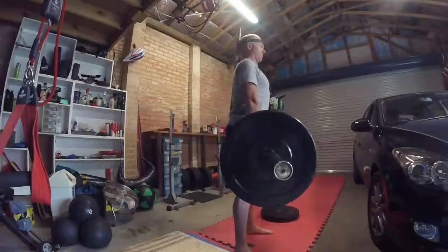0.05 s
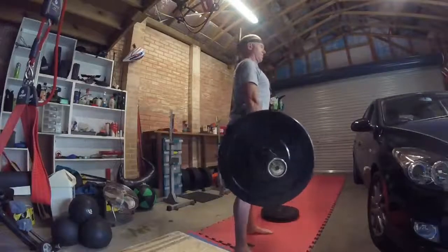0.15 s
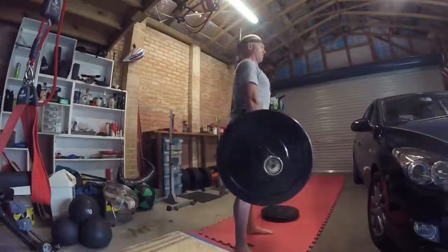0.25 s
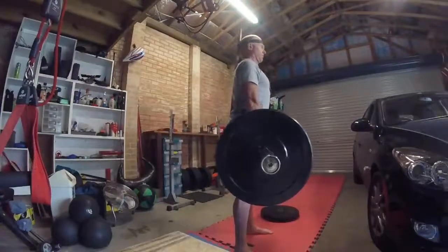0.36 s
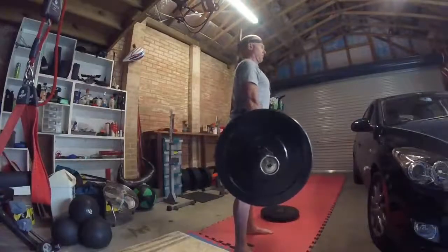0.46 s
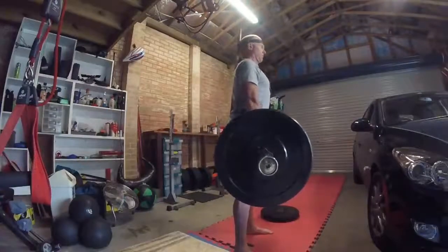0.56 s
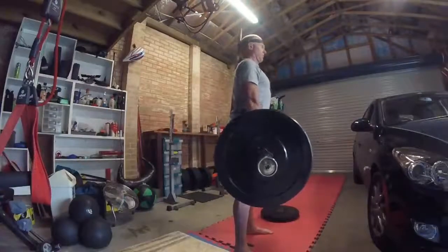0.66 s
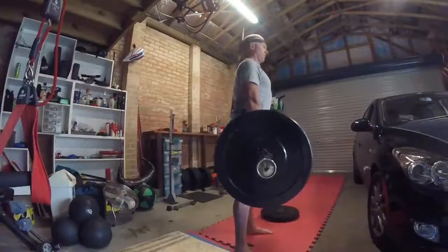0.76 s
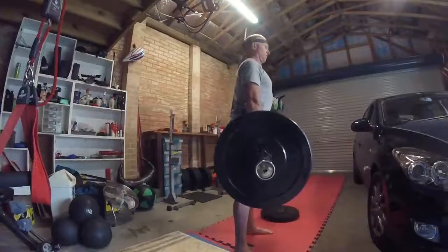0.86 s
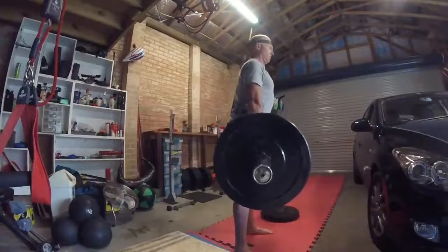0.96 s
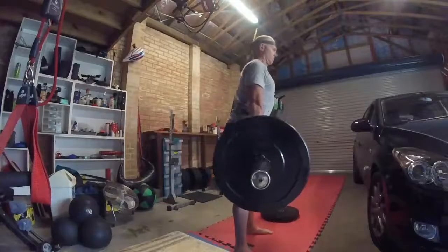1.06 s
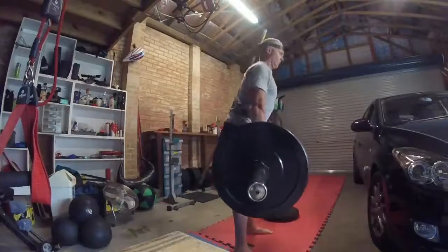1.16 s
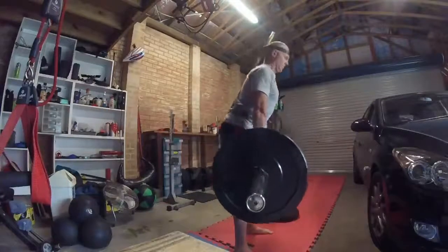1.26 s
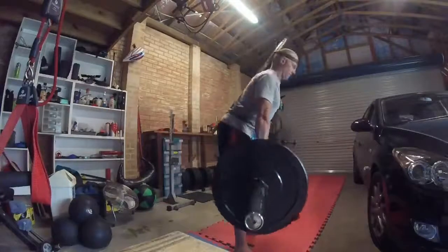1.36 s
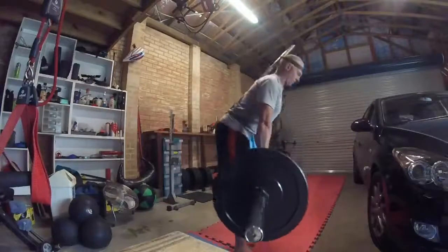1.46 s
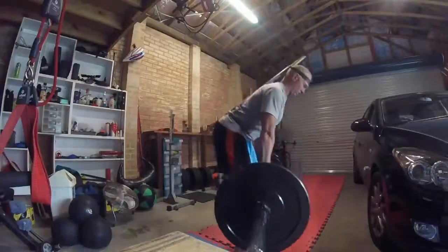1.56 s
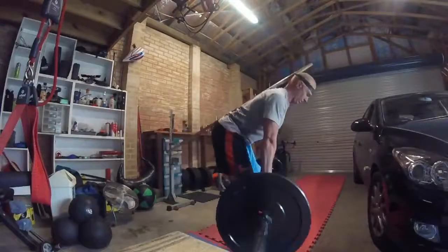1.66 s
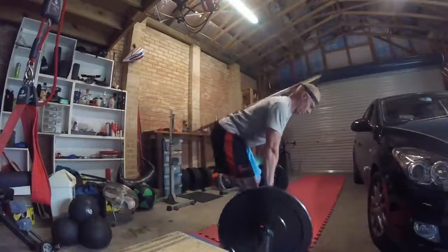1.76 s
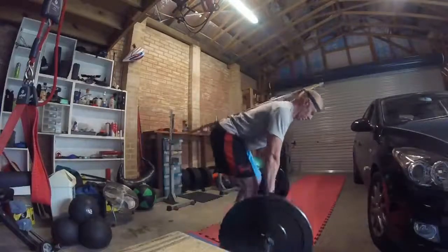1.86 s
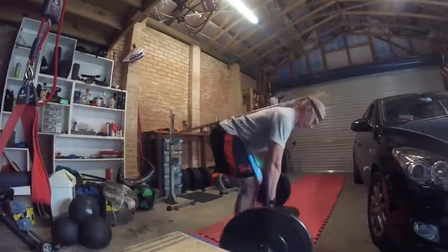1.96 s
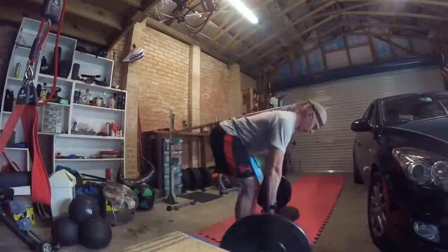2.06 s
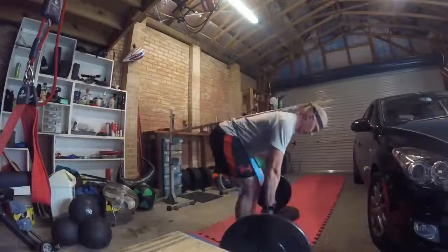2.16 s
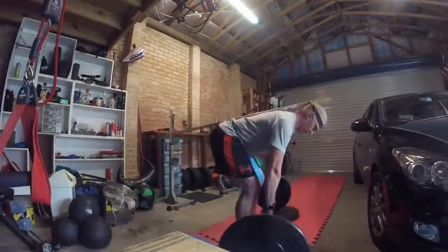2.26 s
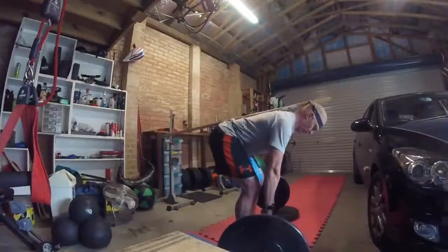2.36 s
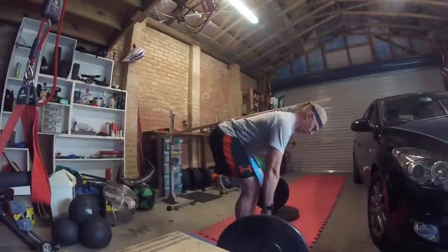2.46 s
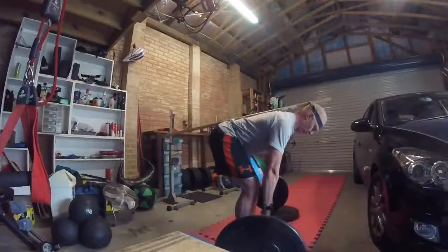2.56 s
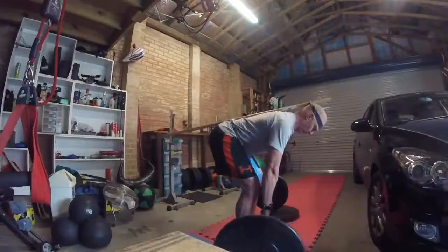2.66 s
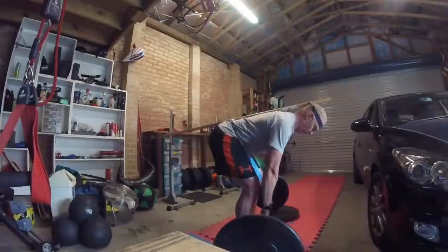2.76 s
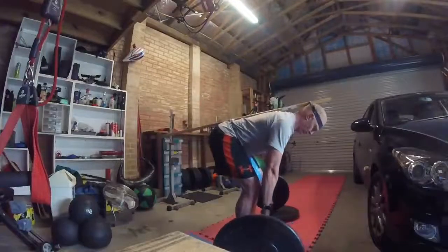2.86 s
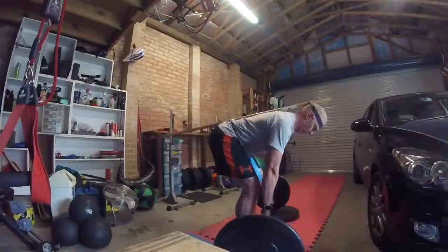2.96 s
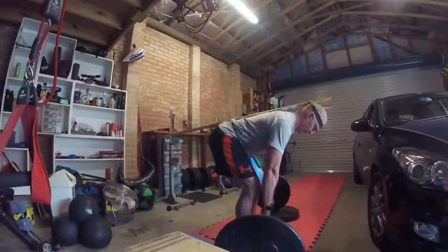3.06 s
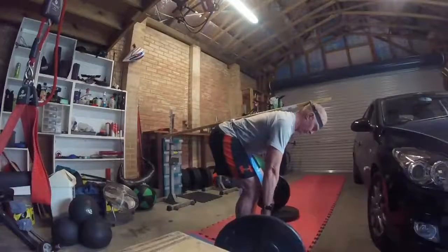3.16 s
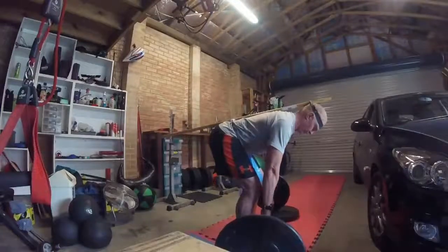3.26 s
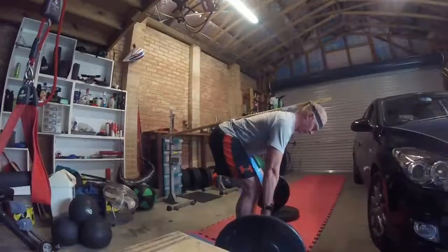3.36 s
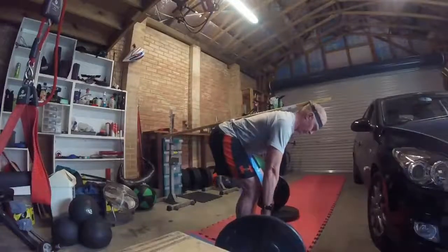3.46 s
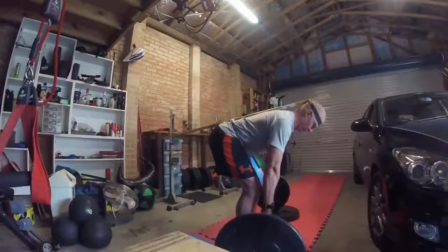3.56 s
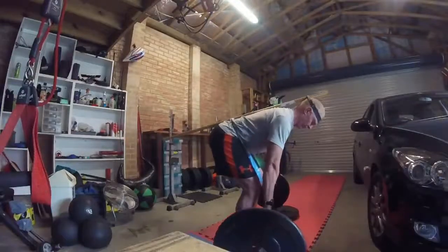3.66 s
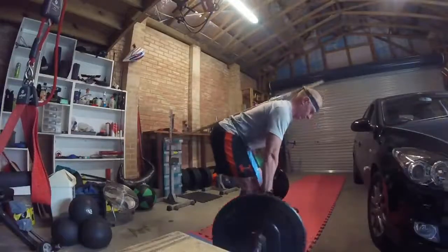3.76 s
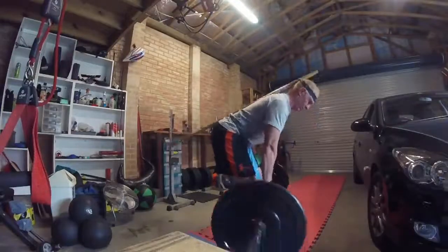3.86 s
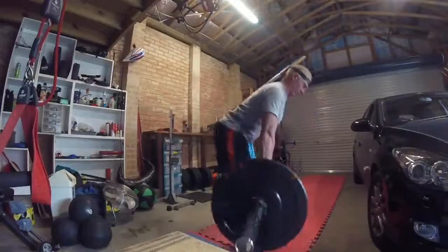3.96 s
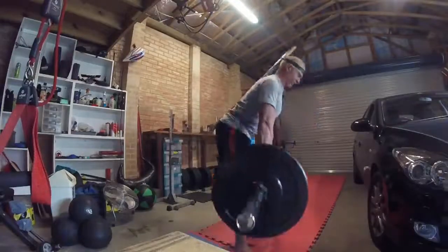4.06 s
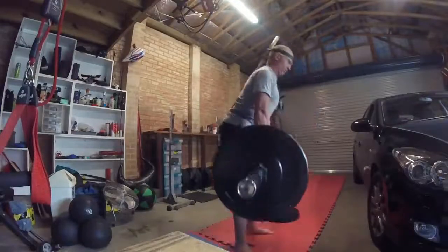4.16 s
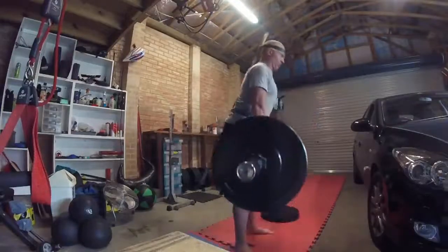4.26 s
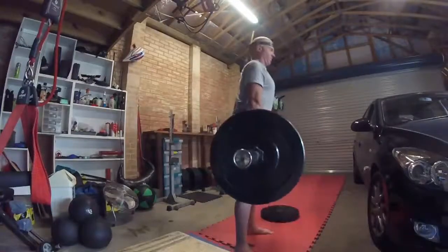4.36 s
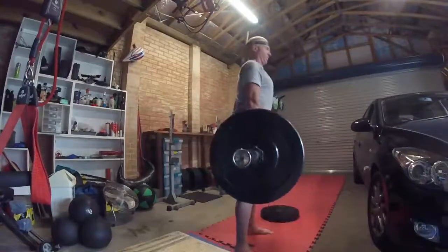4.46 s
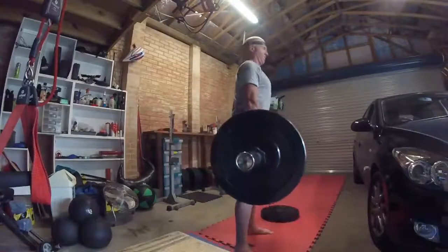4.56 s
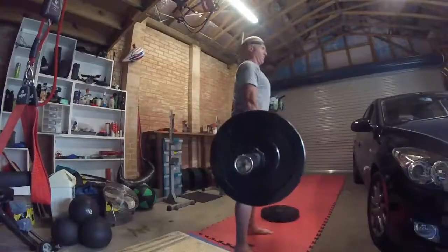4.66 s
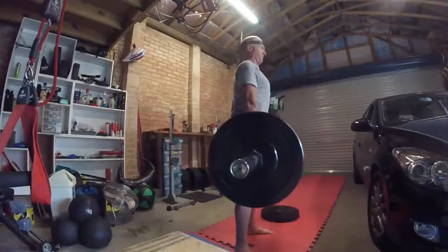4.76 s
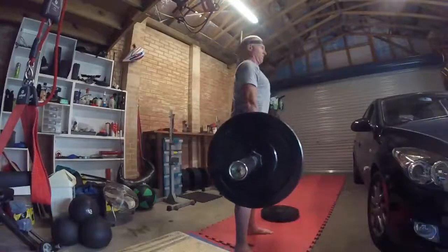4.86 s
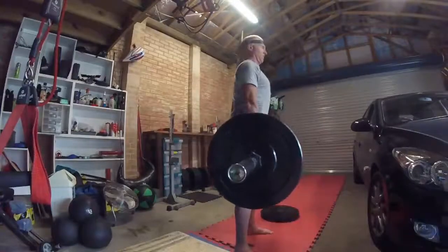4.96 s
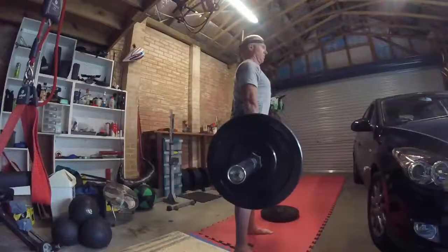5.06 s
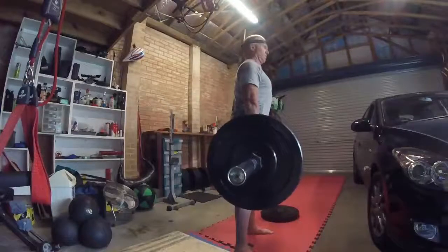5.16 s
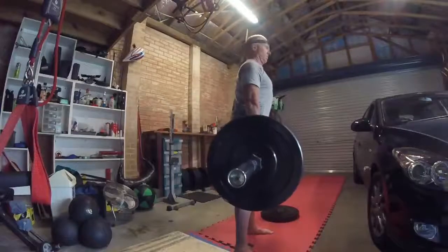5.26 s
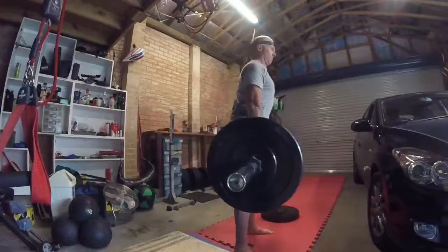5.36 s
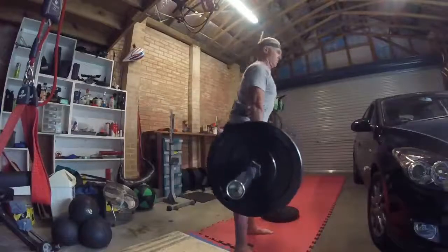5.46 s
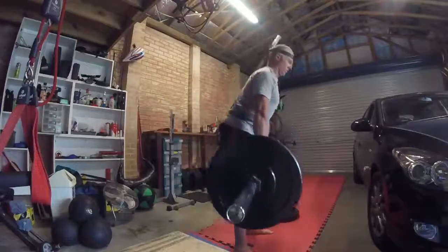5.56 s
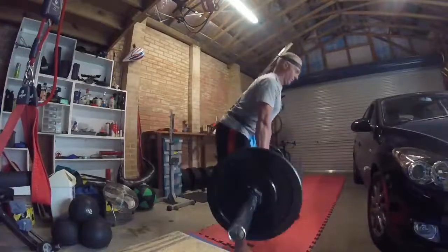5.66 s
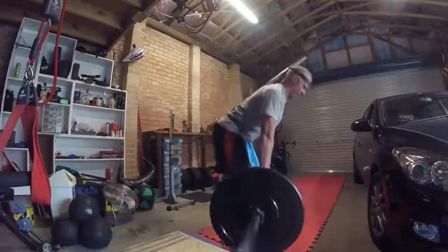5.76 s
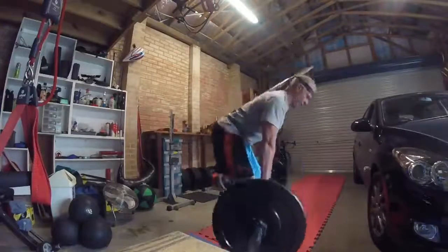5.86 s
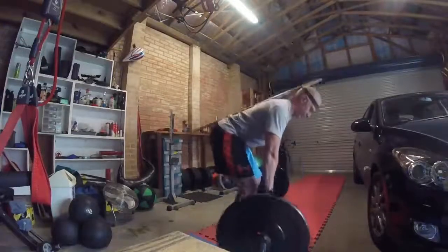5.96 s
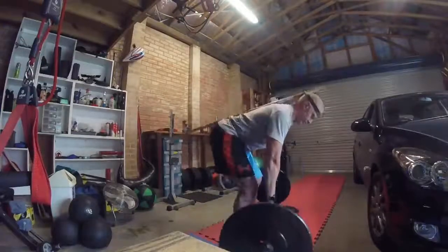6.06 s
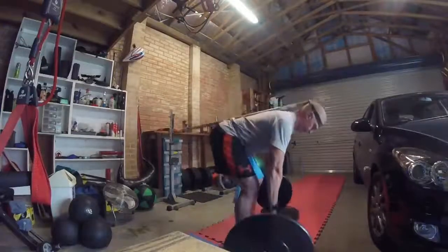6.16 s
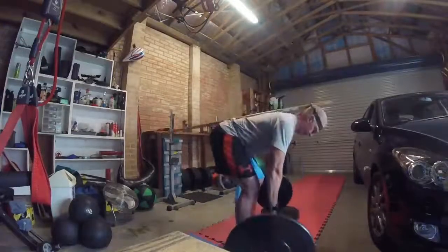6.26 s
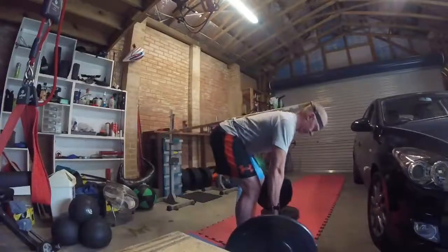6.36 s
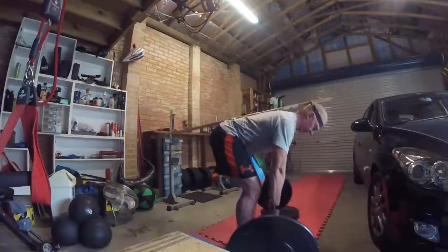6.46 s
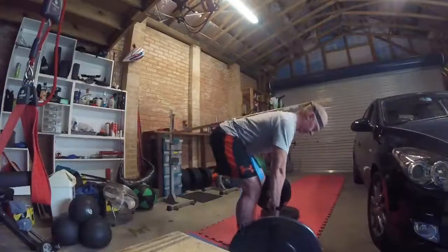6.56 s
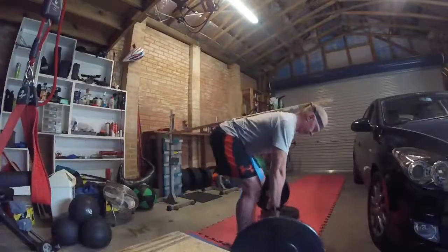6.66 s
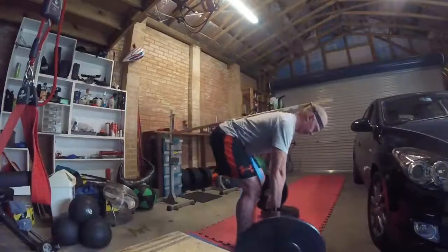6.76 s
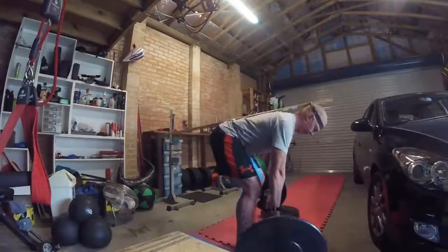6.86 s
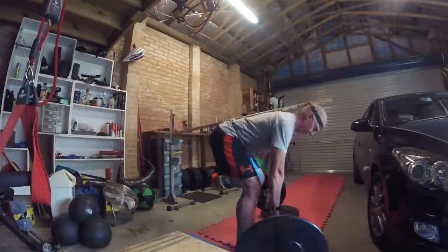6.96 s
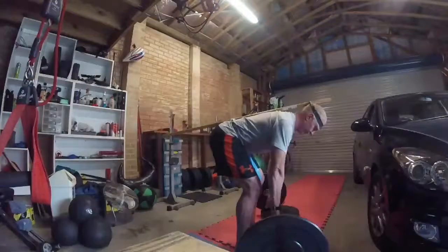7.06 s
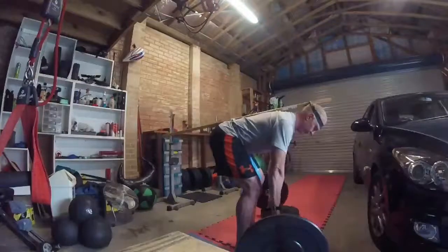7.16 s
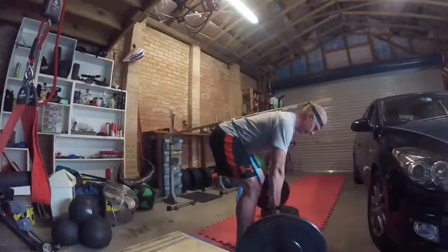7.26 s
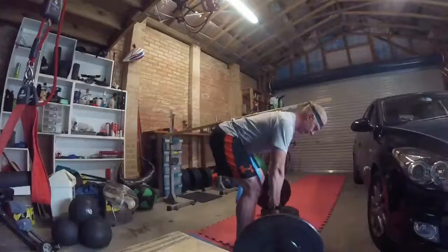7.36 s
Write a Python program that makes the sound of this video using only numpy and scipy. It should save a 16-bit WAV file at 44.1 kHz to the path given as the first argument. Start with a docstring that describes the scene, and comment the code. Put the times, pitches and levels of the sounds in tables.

```python
"""A loaded barbell is set down hard twice in a brick garage, and tugged off the floor once in between.
Rubber plates thud as damped springs; steel hubs knock and rattle on the sleeves as noise bursts through
the modes of bar and hubs. Small clicks mark shifting collars and plates; the garage answers each blow.
Behind lie a faint hiss, a thin whine and a low hum that rises and sinks in pitch about every two seconds.
Each landing pushes the recorder's gain down a little, and it creeps back."""
import sys
import numpy as np
from scipy import signal
from scipy.fft import rfft, irfft, next_fast_len
from scipy.io import wavfile

SR = 44100
rng = np.random.default_rng(int(sys.argv[2]) if len(sys.argv) > 2 else 0)


def inscribe(sig):
    """Save sig as 16-bit PCM at rate SR to the path in sys.argv[1].

    A 1-D sig is mono; a 2-D sig holds one channel per row.
    Samples are clipped to [-1, 1] before scaling.
    """
    pcm = np.round(np.clip(np.atleast_2d(sig).T, -1, 1) * 32767)
    wavfile.write(sys.argv[1], SR, pcm.astype(np.int16))


N = 326731
FILTER_HZ = np.maximum(np.arange(4097) * SR / 8192, 1)
BLOW_S = np.arange(SR) / SR   # one second after a blow


def from_db(db):
    """Decibels to amplitude gain."""
    return 10 ** (np.asarray(db) / 20)


def at_hz(points, hz):
    """Read a (Hz, value) table on a log-frequency axis."""
    table_hz, value = np.transpose(points)
    return np.interp(np.log(np.maximum(hz, 1)), np.log(table_hz), value)


def add(out, start_s, sound):
    """Mix a sound in at start_s, cut at the end of the scene."""
    at = int(round(start_s * SR))
    out[at:at + len(sound)] += sound[:max(N - at, 0)]


def dying(t60_s):
    """Exponential amplitude that falls 60 dB in t60_s."""
    return np.exp(-np.log(1000) * BLOW_S / t60_s)


def drift(points_per_s):
    """Slow random wander: normally distributed points joined by straight lines."""
    return np.interp(np.arange(N) / SR * points_per_s, np.arange(SR), rng.standard_normal(SR))


def resonances(modes):
    """Gain over FILTER_HZ of a flat body with resonant peaks whose powers add to it."""
    power = 1
    for hz, width_hz, db in modes:
        power = power + from_db(db) ** 2 / (1 + (2 * (FILTER_HZ - hz) / width_hz) ** 2)
    return np.sqrt(power)


def coloured(x, gain):
    """Causal (minimum-phase) filter shaped by gain over FILTER_HZ, scaled to unit energy."""
    cepstrum = irfft(np.log(gain + 1e-9))
    half = len(cepstrum) // 2
    # fold the cepstrum onto positive time
    cepstrum[1:half] *= 2
    cepstrum[half + 1:] = 0
    response = irfft(np.exp(rfft(cepstrum)))
    return signal.fftconvolve(x, response / np.linalg.norm(response))


# Reverberation decay of the garage. Each row: band centre in Hz, t60 in s.
GARAGE_DECAY = [(80, 0.51), (400, 0.39), (1200, 0.47), (3000, 0.57), (5500, 0.53), (12000, 0.5)]


def garage_tail():
    """Dense reflections of one blow, each band dying at its own rate; starts near rms 1."""
    white = rfft(rng.standard_normal(SR))
    band_points = [(hz, k) for k, (hz, _) in enumerate(GARAGE_DECAY)]
    band = at_hz(band_points, np.arange(len(white)))   # bins are 1 Hz apart
    tail = np.zeros(SR)
    for k, (_, t60_s) in enumerate(GARAGE_DECAY):
        share = np.maximum(1 - abs(band - k), 0)
        tail += irfft(white * share, SR) * dying(t60_s)
    return tail


def contact(chatter_s, direct_db, spiky_db=3.0, build_s=0.0034):
    """A chatter of tiny impacts peaking at chatter_s, plus the room; direct_db is their energy ratio."""
    age = BLOW_S / max(chatter_s, 1e-4)
    swell = age * np.exp(-np.minimum(age, 20))
    spikes = from_db(spiky_db * rng.standard_normal(SR))
    chatter = rng.standard_normal(SR) * spikes * swell
    tail = garage_tail() * (1 - np.exp(-BLOW_S / build_s))
    return from_db(direct_db) * chatter * np.linalg.norm(tail) / np.linalg.norm(chatter) + tail


# Thuds of the plates: two landings, the tug between them and a faint late one.
# Each row: start in seconds, level in dB before gain control, bounce pitch in Hz, bounce t60 in s,
# room boom in dB re the bounce.
PLATE_THUDS = [(2.034, -22, 92, 0.36, -9), (2.048, -14.5, 107.6, 0.22, -10), (3.509, -24, 187, 0.041, -18),
               (6.1463, -11.5, 114, 0.18, -12), (6.215, -23, 113.6, 0.27, -5.5), (6.6, -42, 168.7, .1, -19)]
# Standing waves of the garage. Each row: Hz, width in Hz, peak in dB over the boom.
GARAGE_MODES = [(112, 6.5, 4.5), (191, 8.8, 7.5), (248, 18, 10.5)]


def thuds(press_s=0.0021, boom_octaves=0.87):
    """Plates bounce on their rubber like a damped spring; the room booms around that pitch."""
    out = np.zeros(N)
    for start_s, level_db, hz, t60_s, boom_db in PLATE_THUDS:
        onset = 1 - np.exp(-BLOW_S / press_s)
        bounce = np.sin(2 * np.pi * hz * BLOW_S) * dying(t60_s) * onset
        around_pitch = 1 / (1 + (np.log2(FILTER_HZ / hz) / boom_octaves) ** 2)
        gain = resonances(GARAGE_MODES) * around_pitch / (1 + (FILTER_HZ / (8 * hz)) ** 2)
        boom = coloured(garage_tail(), gain)[:SR]
        add(out, start_s, from_db(level_db) * (bounce + from_db(boom_db) * boom))
    return out


# Hubs knocking on sleeves. Each row: start in seconds, level in dB before gain control, rattle scale in s
# (rebounds stop at twice this), chatter peak time in s, tilt in dB per octave above 400 Hz.
HUB_KNOCKS = [(2.034, -15, .075, .0028, 0), (2.05, -13, 0.0022, 0.0016, 0), (2.09, -16, 0, 0.0019, 0),
              (2.189, -28, 0, 0.0034, 0), (3.4668, -47, 0.0009, 0.0026, -5), (3.474, -38, 0.031, .002, -2),
              (3.507, -50, 0.016, 0.00086, -2.5), (4.384, -59.5, 0.00017, .003, -5),
              (6.1426, -37, 0, 0.0013, -12), (6.148, -16.5, .05, 0.0023, 0),
              (6.157, -13.5, 0.0041, 0.0031, 1), (6.186, -14, 0.077, 0.0027, 0),
              (6.6, -56.5, 0.0055, 0.0034, -3)]
# Rebounds: mean gap, loss re the knock, further fade at one rattle scale, added tilt
REBOUND_GAP_S, REBOUND_LOSS_DB, RATTLE_FADE_DB, REBOUND_TILT_DB_PER_OCT = .011, 7, 7.5, 0.33


def rattles():
    """Each knock and its run of weaker, brighter rebounds: rows of (s, dB, chatter s, tilt)."""
    rows = []
    all_gaps = rng.uniform(.7, 1.3, size=(len(HUB_KNOCKS), 24))
    for (start_s, level_db, rattle_s, chatter_s, tilt), gaps in zip(HUB_KNOCKS, all_gaps):
        rows.append((start_s, level_db, chatter_s, tilt))
        for age_s in REBOUND_GAP_S * np.cumsum(gaps):
            if age_s < 2 * rattle_s:
                loss_db = REBOUND_LOSS_DB + RATTLE_FADE_DB * (age_s / rattle_s) ** 2
                rows.append((start_s + age_s, level_db - loss_db, chatter_s, tilt + REBOUND_TILT_DB_PER_OCT))
    return rows


# Ringing of bar and hubs. Each row: Hz, width in Hz, peak in dB over the body of a knock.
BAR_AND_HUB_MODES = [(1056, 16, 9), (1100, 22, 6.5), (1148, 20, 4), (1536, 12, 13), (1807, 14, 11),
                     (2110, 18, 8.5), (2391, 40, 7), (2705, 50, 9), (2831, 16, 13), (2886, 16, 13),
                     (3087, 24, 18.5), (3486, 34, 14.5), (3845, 80, 10), (3955, 50, 8), (4197, 25, 10),
                     (4455, 50, 6), (4645, 90, 8), (5044, 16, 15.5), (5530, 110, 8), (5945, 45, 13),
                     (6110, 50, 7), (6405, 55, 13), (6530, 70, 10), (6850, 70, 7), (7320, 60, 8),
                     (7820, 60, 12), (8380, 110, 10), (8840, 30, 13)]
# Spectrum of a knock's body. Each row: Hz, relative density in dB per Hz.
KNOCK_BODY = [(40, -27), (100, -2.5), (230, 3.5), (480, -2), (700, -1), (1250, -1.5), (1550, -7.5),
              (2200, 2), (3200, -2), (4500, -1), (6600, -5), (8000, -16.5), (10500, -25), (13500, -49.5)]


def clatter(direct_db=-4.5, uneven_db=0.5):
    """Steel knocks on steel; each mode's strength varies slightly at random from knock to knock."""
    out = np.zeros(N)
    for start_s, level_db, chatter_s, tilt in rattles():
        modes = [(hz, width_hz, db + uneven_db * rng.standard_normal())
                 for hz, width_hz, db in BAR_AND_HUB_MODES]
        tilt_db = tilt * np.log2(np.maximum(FILTER_HZ, 400))
        body = from_db(at_hz(KNOCK_BODY, FILTER_HZ) + tilt_db)
        knock = coloured(contact(chatter_s, direct_db), body * resonances(modes))
        add(out, start_s, from_db(level_db) * knock)
    return out


# Collars and plates shifting. Each row: start in seconds, level in dB before gain control,
# pitch in Hz, half-width in octaves, chatter peak time in s.
SHIFT_CLICKS = [(3.475, -50.5, 620, 0.28, 0.0055), (3.48, -45.5, 2480, 0.5, 0.002),
                (3.5058, -42.5, 5260, 0.28, 0.0006), (4.224, -68, 533, 0.29, 0.0019),
                (4.383, -61, 1284, 0.18, 0.0023), (4.39, -71, 2920, .15, .002),
                (4.435, -74, 4100, .18, .001), (6.604, -63, 623, 0.74, 0.0029),
                (7.368, -79, 4290, .5, 0.002)]


def clicks(direct_db=4.5, top_hz=9000):
    """Light contacts, each through one broad resonance."""
    out = np.zeros(N)
    for start_s, level_db, hz, width_oct, chatter_s in SHIFT_CLICKS:
        gain = 1 / (1 + (np.log2(FILTER_HZ / hz) / width_oct) ** 2) / (1 + (FILTER_HZ / top_hz) ** 6)
        add(out, start_s, from_db(level_db) * coloured(contact(chatter_s, direct_db), gain))
    return out


# Hum cycle: rises to its top pitch, sags while it holds, sinks back
HUM_FIRST_TOP_S, HUM_PERIOD_S = .12, 2.015
HUM_RISE_S, HUM_HOLD_S, HUM_FALL_S = .22, .88, 0.26   # hold counts from the top to the start of the fall
HUM_REST_HZ, HUM_TOP_HZ, HUM_SAG_HZ_PER_S = 31, 76.2, 21
# mean rms level: while high; lull base; swell regained through the lull
HUM_TOP_DB, HUM_LULL_DB, HUM_SWELL_DB = -53.5, -59, 6


def hum(waver=.07, flutter_db=2.0):
    """A wavering low sine that rises, sags and sinks once a cycle; its level follows the cycle."""
    age_s = (np.arange(N) / SR - HUM_FIRST_TOP_S + HUM_RISE_S) % HUM_PERIOD_S - HUM_RISE_S
    rise = 1 + age_s / HUM_RISE_S
    fall = 1 - (age_s - HUM_HOLD_S) / HUM_FALL_S
    up = np.clip(np.minimum(rise, fall), 0, 1)
    pitch_hz = HUM_REST_HZ + up * (HUM_TOP_HZ - HUM_SAG_HZ_PER_S * age_s - HUM_REST_HZ)
    rested = np.minimum((age_s - HUM_HOLD_S) % HUM_PERIOD_S / (HUM_PERIOD_S - HUM_HOLD_S), 1)
    lull_db = HUM_LULL_DB + HUM_SWELL_DB * rested
    level_db = up * HUM_TOP_DB + (1 - up) * lull_db + flutter_db * drift(20)
    phase = 2 * np.pi * np.cumsum(pitch_hz * (1 + waver * drift(30))) / SR
    return from_db(level_db) * np.sqrt(2) * np.sin(phase)


# Background spectrum. Each row: Hz, relative density in dB per Hz.
AIR_SPECTRUM = [(20, 5), (60, -2), (110, -8), (250, -13.5), (600, -21), (1500, -24), (3000, -28),
                (4400, -35), (5800, -32.5), (6500, -19.5), (7300, -25.5), (9000, -30), (10500, -35.5),
                (14000, -36)]
AIR_RMS_DB = -53
WHINE_HZ, WHINE_RMS_DB = 927, -74


def background():
    """Steady air and hiss as shaped noise, with a thin wandering sine for the whine."""
    white = rfft(rng.standard_normal(next_fast_len(N)))
    hz = np.linspace(0, SR / 2, len(white))
    air = irfft(white * from_db(at_hz(AIR_SPECTRUM, hz)) * np.minimum(hz / 20, 1))[:N]
    whine = np.sqrt(2) * np.sin(2 * np.pi * np.cumsum(WHINE_HZ + 2.5 * drift(11.0)) / SR)
    return from_db(AIR_RMS_DB) * air / air.std() + from_db(WHINE_RMS_DB) * whine


def scene():
    """The barbell over the quiet garage, in mono."""
    return (thuds() + clatter() + clicks() + hum() + background())[None, :]


# SQUEEZE: share of the excess over threshold taken off, in dB per dB
THRESHOLD_DB, SQUEEZE, GAIN_ATTACK_S, RECOVERY_DB_PER_S = -22.5, 0.28, 0.0096, 1.05


def gain_control(x):
    """Smoothed power over the threshold turns the gain down; it recovers at a constant dB rate."""
    keep = np.exp(-1 / (GAIN_ATTACK_S * SR))
    power = signal.lfilter([1 - keep], [1, -keep], x ** 2)
    level_db = 10 * np.log10(power + 1e-12)
    wanted_cut_db = SQUEEZE * np.maximum(level_db - THRESHOLD_DB, 0)
    # a running maximum on a rising ramp holds each cut and lets it decay at the ramp's slope
    recovered_db = RECOVERY_DB_PER_S * np.arange(N) / SR
    cut_db = np.maximum.accumulate(wanted_cut_db + recovered_db, axis=-1) - recovered_db
    return x * from_db(-cut_db)


CEILING_DB, STOPBAND_HZ = -1.5, 14700


def record(dry):
    """Gain control, peaks rounded off towards the ceiling, then a steep treble cut."""
    x = gain_control(dry)
    rounded = x / (1 + (x / from_db(CEILING_DB)) ** 8) ** (1 / 8)
    treble_cut = signal.cheby2(20, 70, STOPBAND_HZ, fs=SR, output="sos")
    return signal.sosfilt(treble_cut, rounded)


dry = scene()
out = record(dry)
inscribe(out)
```